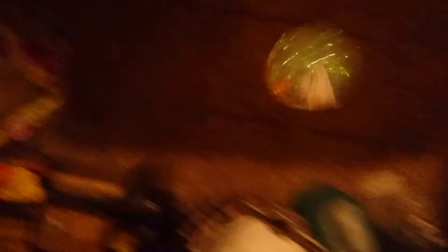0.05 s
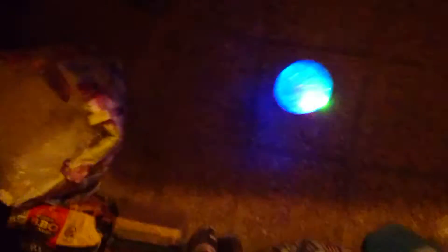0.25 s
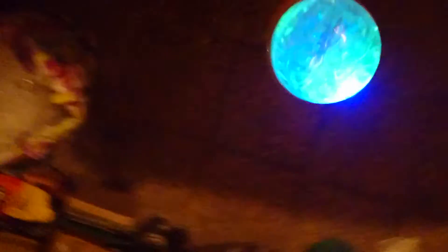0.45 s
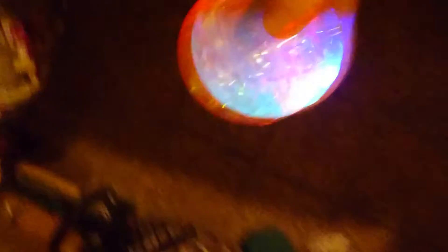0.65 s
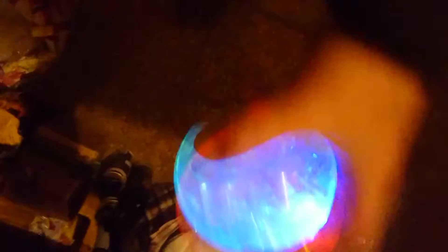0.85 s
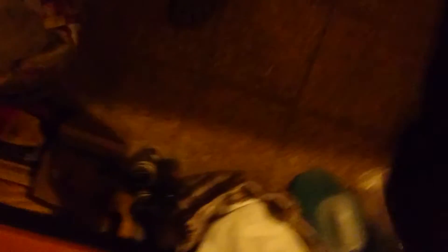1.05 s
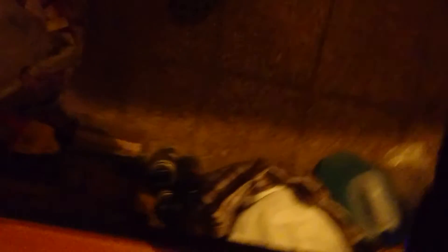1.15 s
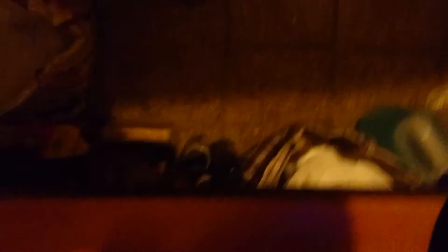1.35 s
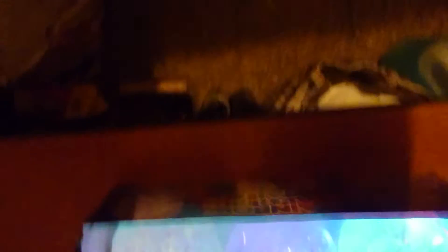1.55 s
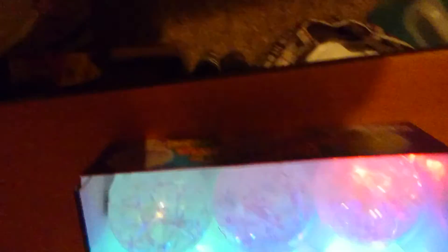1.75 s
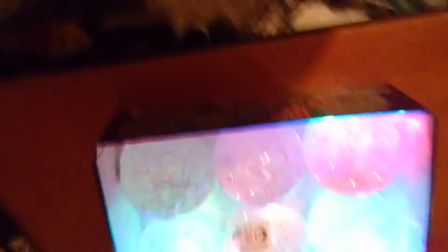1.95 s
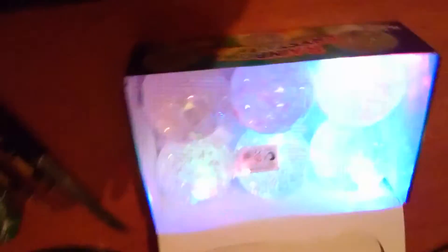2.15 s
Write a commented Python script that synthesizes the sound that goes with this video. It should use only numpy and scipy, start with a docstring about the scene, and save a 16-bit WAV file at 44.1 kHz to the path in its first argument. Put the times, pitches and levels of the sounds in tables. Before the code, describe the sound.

A hard rubber ball hits a tiled floor at 0.2 seconds with a bright crack, brief ring and low thump in a small room. A soft catch follows around 0.6 seconds, then faint sleeve swishes. From 1.5 to 1.8 seconds, a cardboard and plastic box knocks, snaps and scrapes on a nearby table. The handheld microphone rumbles, with muffled bumps at 1.9 seconds and a finger rub around 2 seconds.

```python
"""Ball bounce and box slide

A hard rubber light-up ball hits a tiled floor once in a small room: a bright crack, a ringing shell
and a low thump. A hand catches it softly. Then a cardboard and plastic box is knocked and slid on a
table close by, while the hand that holds the microphone bumps and rubs it."""
import sys
import numpy as np
from scipy import signal
from scipy.fft import rfft, irfft
from scipy.io import wavfile

SR = 44100
rng = np.random.default_rng(int(sys.argv[2]) if len(sys.argv) > 2 else 0)


def put_to_file(sound):
    """Save the sound as 16-bit audio at rate SR, in the file named by the first command-line argument."""
    columns = np.atleast_2d(sound).T  # one column per channel
    safe = np.clip(columns, -1, 1)
    whole_steps = np.round(safe * 32767)
    wavfile.write(sys.argv[1], SR, whole_steps.astype(np.int16))


N = 97020
TIME = np.arange(N) / SR
FFT_SIZE = 2 ** 17
FREQS = np.maximum(np.arange(FFT_SIZE // 2 + 1) * SR / FFT_SIZE, 1)
BOUNCE_S, SNAP_S = 0.221, 1.6445

# stereo image: likeness of the channels (f/Hz, correlation)
LIKENESS = [(40, 0.28), (150, 0.025), (700, 0.44), (1300, -0.13), (2200, -0.1), (5000, 0.012),
            (16000, -0.027)]
# tilt between the two microphone ports; pan is always left minus right (f/Hz, pan/dB)
PORT_TILT = [(150, 1), (600, 2.5), (1400, -3), (3000, 1), (8000, -0.5), (13000, 1)]
# room tone (t/s, air level/dB, hiss level/dB)
ROOM_FADES = [(0, -66.5, -71), (0.09, -73, -79.5), (0.55, -65, -67), (0.8, -68, -74.5), (1.0, -69.5, -64.5),
              (1.43, -65.5, -68.5), (1.9, -61, -65.5), (2.2, -69, -70.5)]
# tone of the air and of the hiss (f/Hz, level/dB)
AIR_EQ = [(100, 5.5), (200, 0.5), (480, -2.5), (800, -5), (1300, -10), (2300, -10.5), (3500, -13),
          (5000, -21), (7000, -31.5), (16000, -32)]
HISS_EQ = [(1500, -5), (4400, -7.5), (6800, -11), (9000, -8), (12300, 0), (14000, -9.5), (16000, -3.5)]

# dull bumps through the grip (t/s, level/dB, f/Hz, t60/s, pan/dB)
BUMPS = [(0.607, -45.5, 129.5, 0.019, 20), (0.649, -48.5, 195, 0.03, 0), (1.583, -27.5, 72.6, 0.21, 3),
         (1.667, -33.5, 54.6, 0.21, 3.5), (1.682, -34.5, 88.3, 0.19, 2), (1.901, -24.5, 26.7, 0.094, 34),
         (1.903, -23, 90, 0.01, 17), (1.948, -18, 93, 0.0065, 13)]
# rumble of the moving microphone (t/s, level/dB)
RUMBLE_FADE = [(0, -57), (0.3, -47.5), (0.55, -55), (0.76, -49), (0.92, -61), (1.2, -60), (1.36, -52.5),
               (1.6, -49.5), (1.85, -37.5), (2.05, -38), (2.2, -47.5)]
# a finger rubs beside the microphone (t/s, level/dB, pan/dB)
RUB_FADE = [(1.93, -100, 10), (1.96, -72, 7), (2.005, -54, 11), (2.021, -42.5, 14), (2.038, -40, 2),
            (2.045, -49, 14), (2.07, -72, 5), (2.1, -100, 3)]
# the finger catches and lets go (t/s, level/dB)
SLIPS = [(2.0258, -28), (2.0289, -27), (2.0327, -28), (2.0401, -20), (2.041, -17)]
# tone of the rumble, rub and slips (f/Hz, level/dB)
RUMBLE_EQ = [(10, 3), (20, -3), (40, -11.5), (80, -31.5), (160, -33), (1000, -63)]
RUB_EQ = [(150, 6.5), (850, -6), (1400, -21), (2100, -17.5), (3600, -13.5), (4500, -3.5), (5050, 1),
          (5700, -10), (6700, -20), (10000, -19), (12500, -13), (16000, -21)]
SLIP_EQ = [(700, 10.5), (1500, -8.5), (5000, 5.5), (6500, -2), (12000, 2), (16000, -13)]

# swishes of hand and sleeve (t/s, attack/s, t60/s, mid level/dB, treble level/dB)
SWISHES = [(0.109, 0.013, 0.68, -59.5, -64.5), (0.578, 0.0047, 0.17, -65, -64),
           (0.616, 0.011, 0.26, -66.5, -58.5), (0.92, 0.051, 0.51, -85, -70),
           (0.976, 0.0055, 0.24, -65.5, -66), (1.029, 0.0023, 0.34, -58.5, -57)]
# their two bands (f/Hz, level/dB)
SWISH_MID_EQ = [(150, -2.5), (500, -9.5), (1400, -6), (1900, -1), (2700, -4.5), (4500, -9.5), (7000, -26.5)]
SWISH_TREBLE_EQ = [(2500, -21), (4500, -5), (7500, -6.5), (10000, 1), (12500, 6.5), (16000, -4)]
# the ball ticks against the catching hand (t/s, level/dB)
CATCH_TICKS = [(0.5815, -62), (0.589, -57), (0.617, -48), (0.648, -51)]

# the box's scrape and its brief hum (t/s, level/dB)
SLIDE_FADE = [(1.462, -100), (1.475, -55), (1.535, -44.5), (1.566, -56), (1.583, -34.5), (1.62, -37),
              (1.655, -39.5), (1.71, -40), (1.745, -48), (1.80, -48.5), (1.83, -58), (1.88, -73),
              (1.96, -63), (2.05, -67), (2.08, -100)]
JUDDER_FADE = [(1.70, -80), (1.745, -56), (1.795, -56), (1.815, -80)]
# tone of the scrape, the hum and the edge's snap (f/Hz, level/dB)
SLIDE_EQ = [(100, -4), (230, -2), (430, -9), (640, -8.5), (1000, -7), (1400, -9.5), (1900, -7.5),
            (2800, -11.5), (5200, -15.5), (6200, -19), (7200, -22.5), (10800, -21.5), (12400, -16),
            (16000, -23.5)]
JUDDER_EQ = [(700, -47), (960, -18.5), (1030, -1.5), (1100, -23), (1500, -35)]
SNAP_EQ = [(500, -28), (1900, -4), (2900, -8.5), (4000, -5.5), (5100, 2.5), (6250, 2), (6900, -14.5),
           (10000, -16.5), (12500, -9.5), (16000, -29)]
# knocks of the box (t/s, t60/s, hollow/dB, panel/dB, edge/dB, crisp/dB, pan/dB)
KNOCKS = [(1.4709, 0.078, -54, -43, -59, -50.5, -3.5), (1.509, 0.044, -47, -45, -51.5, -56, 6),
          (1.5159, 0.044, -37, -38, -44.5, -51, -5.5), (1.529, 0.073, -42, -49, -73, -51, -2.5),
          (1.571, 0.079, -40, -31, -35, -43.5, -1.5), (1.5818, 0.044, -37, -30, -30.5, -38, -3.5),
          (1.5853, 0.11, -36.5, -27.5, -31.5, -47, -6), (1.6, 0.045, -35, -29, -28, -35, 0),
          (1.615, 0.14, -43.5, -36.5, -36, -43.5, -16), (1.6225, 0.072, -38.5, -39.5, -32.5, -35.5, 3),
          (1.6558, 0.072, -68, -44.5, -34, -59, -1), (1.6682, 0.066, -38, -36.5, -35, -49, -3),
          (1.69, 0.034, -64, -61, -38.5, -57, -2), (1.757, 0.17, -47.5, -59.5, -53.5, -45, -3),
          (1.9004, 0.043, -50.5, -59, -53.5, -53, 23), (1.9287, 0.0089, -50, -57, -61, -47, -8.5)]
# its four bands, from hollow body up to plastic window (f/Hz, level/dB)
HOLLOW_EQ = [(100, -19), (250, -7), (430, -9.5), (620, -0.5), (850, -4), (1200, -12.5), (2000, -25),
             (5000, -38)]
PANEL_EQ = [(300, -43.5), (800, 0), (1200, -1), (1600, 1.5), (1900, 3.5), (2500, -6.5), (3500, -3),
            (7000, -44.5)]
EDGE_EQ = [(1000, -22.5), (2800, -21), (4000, -2), (5200, 1), (6100, -4), (6800, -13.5), (10000, -18.5),
           (16000, -44.5)]
CRISP_EQ = [(3000, -34.5), (6500, -4), (8300, -1), (10500, -1.5), (12400, 9), (14000, -3.5), (16000, -9)]
# the box thuds on the table (t/s, level/dB)
THUDS = [(1.5158, -38), (1.5822, -43.5), (1.6012, -38), (1.6688, -26.5)]
# modes of the hollow box, relative to each thud (f/Hz, level/dB)
BOX_MODES = [(330, -12), (560, -8), (621, -3), (690, -5), (740, -9.5), (1125, -7.5)]

# the floor's thump, direct and off the walls (t/s, level/dB)
THUMP_ARRIVALS = [(0.2217, -46), (0.2331, -27), (0.2428, -29.5), (0.2686, -36)]
# low modes of floor and room (f/Hz, level/dB, t60/s)
ROOM_MODES = [(46, -40, 0.46), (90, -40.5, 0.38), (150.2, -40.5, 0.27), (207.1, -47, 0.37)]
# tone of the ball's slap and of its crack in the room (f/Hz, level/dB)
SLAP_EQ = [(200, -15.5), (450, -29), (750, -9.5), (1300, -23.5), (2200, -16), (3750, -9), (4150, -23),
           (4500, -12), (5400, -9), (7700, -5.5), (8450, -20), (9000, -6), (11900, 0), (16000, -1)]
CRACK_EQ = [(200, -12.5), (400, -27.5), (720, -20), (1250, -34), (1900, -23), (2600, -23.5), (3250, -15),
            (3780, -10.5), (4150, -21), (4500, -6.5), (4850, -9), (5350, 1.5), (6050, -2), (7150, -9),
            (7650, -4), (8400, -12.5), (9200, -3.5), (10400, -10), (12200, -1.5), (13700, -8),
            (16000, -13.5)]
# the crack comes back from the walls (t/s, level/dB)
WALL_ECHOES = [(0.2343, -26.5), (0.2503, -24), (0.3107, -39)]
# ring of the ball's shell (f/Hz, level/dB)
SHELL_MODES = [(3290, -48), (3790, -49.5), (5185, -41.5), (5295, -37.5), (5337, -34.5), (5512, -41),
               (6005, -36), (9468, -39.5), (11598, -36.5), (13690, -42)]


def amp(db):
    """Decibels to gain."""
    return 10 ** (np.asarray(db) / 20)


def in_time(rows):
    """One automation curve for each column after the time."""
    times, *columns = np.transpose(rows)
    return [np.interp(TIME, times, column) for column in columns]


def over_hz(points):
    """A curve through the points on a log frequency axis."""
    hz, values = np.transpose(points)
    return np.interp(np.log(FREQS), np.log(hz), values)


def pan(db):
    """Constant-power left and right gains for a level difference."""
    gains = amp(np.array([[.5], [-.5]]) * db)
    return gains / np.sqrt(np.mean(gains ** 2, axis=0))


def eq(x, points):
    """Minimum-phase EQ, scaled to keep the power of white noise."""
    gain = amp(over_hz(points))
    cepstrum = irfft(np.log(gain / np.sqrt(np.mean(gain ** 2))))
    cepstrum[1:FFT_SIZE // 2] *= 2
    cepstrum[FFT_SIZE // 2 + 1:] = 0
    return irfft(rfft(x, FFT_SIZE) * np.exp(rfft(cepstrum)))[..., :N]


def noise():
    """Wide white noise, the channels partly alike in the lows and unrelated in the treble."""
    alike = over_hz(LIKENESS)
    mid, side = rfft(rng.standard_normal((2, FFT_SIZE)))
    return irfft(np.sqrt((1 + alike) / 2) * mid + np.sqrt((1 - alike) / 2) * side * [[1], [-1]])[:, :N]


def decay(start, t60, attack=0.000055):
    """Linear attack, exponential fall; times in seconds."""
    age = TIME - start
    return np.clip(age / attack, 0, 1) * np.exp(-np.log(1000) * np.clip((age - attack) / t60, 0, 10))


def click(start):
    """A one-sample impulse."""
    return 1.0 * (np.arange(N) == int(start * SR))


def mode(start, hz, t60, attack=0.000076):
    """A struck, dying sine."""
    return decay(start, t60, attack) * np.sin(2 * np.pi * hz * (TIME - start))


def friction(grains_per_s, rough_db):
    """Stick and slip: noise grains at random moments, each with its own strength."""
    grain = np.cumsum(rng.random(N) < grains_per_s / SR)
    strength = amp(rough_db * np.minimum(rng.exponential(1, N), 4))[grain]
    return noise() * strength / np.sqrt(np.mean(strength ** 2))


def room_tone():
    """A bed of quiet air and thin hiss that swell and fade."""
    air_db, hiss_db = in_time(ROOM_FADES)
    return (eq(noise(), AIR_EQ) * amp(air_db) + eq(noise(), HISS_EQ) * amp(hiss_db)) * pan(-1.2)


def mic_handling():
    """The grip on the microphone: muffled bumps, rumble and a finger's rub with crisp slips."""
    bumps = sum(amp(db) * mode(s, hz, t60) * pan(pan_db) for s, db, hz, t60, pan_db in BUMPS)
    bumps = signal.sosfilt(signal.butter(2, 280.3, "lowpass", fs=SR, output="sos"), bumps)
    rumble_db, = in_time(RUMBLE_FADE)
    rumble = eq(noise(), RUMBLE_EQ) * amp(rumble_db) * pan(14)
    rub_db, pan_db = in_time(RUB_FADE)
    rub = eq(friction(grains_per_s=510, rough_db=4) * amp(rub_db), RUB_EQ) * pan(pan_db)
    slips = eq(sum(amp(db) * click(s) for s, db in SLIPS), SLIP_EQ) * pan(-16)
    return bumps + rumble + rub + slips


def throw_and_catch():
    """Hand and sleeve swish as they throw, catch and reach; the ball ticks against the hand."""
    swishes = 0
    for k, band in enumerate((SWISH_MID_EQ, SWISH_TREBLE_EQ)):
        power = sum((amp(levels[k]) * decay(s, t60, attack)) ** 2 for s, attack, t60, *levels in SWISHES)
        swishes += eq(friction(grains_per_s=800, rough_db=2) * np.sqrt(power), band)
    ticks = noise() * sum(amp(db) * decay(s, t60=0.012) for s, db in CATCH_TICKS)
    return swishes * pan(-2.2) + eq(ticks, SWISH_TREBLE_EQ)


def box_slide():
    """The box scrapes over the table and briefly judders with a narrow hum."""
    slide_db, = in_time(SLIDE_FADE)
    scrape = eq(friction(grains_per_s=1400, rough_db=1.5) * amp(slide_db), SLIDE_EQ)
    judder_db, = in_time(JUDDER_FADE)
    gate = (TIME > JUDDER_FADE[0][0]) & (TIME < JUDDER_FADE[-1][0])
    judder = eq(noise() * amp(judder_db) * gate, JUDDER_EQ)
    return (scrape + judder) * pan(-1.5)


def box_knocks():
    """Each knock is a sharp click and a short noisy chatter in the box's four bands."""
    click_gain = amp(-6) * np.sqrt(SR / 1000)   # 6 dB under the energy of 1 ms of chatter
    knocks = 0
    for k, band in enumerate((HOLLOW_EQ, PANEL_EQ, EDGE_EQ, CRISP_EQ)):
        chatter_power = clicks = 0
        for s, t60, *levels, pan_db in KNOCKS:
            gain = amp(levels[k]) * pan(pan_db)
            chatter_power += (gain * decay(s, t60, attack=0.00052)) ** 2
            clicks += gain * click(s + rng.random() / 1000)
        knocks += eq(noise() * np.sqrt(chatter_power) + clicks * click_gain, band)
    return knocks


def box_thuds():
    """Heavy contacts ring the hollow body; its modes alternate polarity in pairs."""
    body = sum(amp(thud_db + db) * mode(s, hz, t60=0.036, attack=0.0008) * (-1) ** (k // 2)
               for s, thud_db in THUDS for k, (hz, db) in enumerate(BOX_MODES))
    return body * pan(-0.53)


def box_snap():
    """The box's edge snaps against the table: a click on a tight noise burst."""
    burst = noise() * amp(-17.5) * decay(SNAP_S, t60=0.02, attack=0.0001)
    return eq(burst + amp(-7) * click(SNAP_S), SNAP_EQ)


def floor_thump():
    """The low end of the bounce: the floor thumps and the room's modes boom."""
    thump = sum(amp(db) * mode(s, hz=106, t60=0.05) for s, db in THUMP_ARRIVALS)
    boom = sum(amp(db) * mode(BOUNCE_S, hz, t60) for hz, db, t60 in ROOM_MODES)
    return (thump + boom) * pan(1.7)


def room_damping(ring, dull_hz=7000, dull_s=0.17, knee_s=0.11, fade_db_per_s=139):
    """The room swallows the bounce's treble; past the knee the whole tail dies faster."""
    age = np.maximum(TIME - BOUNCE_S, 0)
    dull = irfft(rfft(ring, FFT_SIZE) / (1 + (FREQS / dull_hz) ** 8))[:, :N]
    treble = (ring - dull) * np.exp(-(age / dull_s) ** 2)
    return (dull + treble) * amp(-fade_db_per_s * np.maximum(age - knee_s, 0))


def ball_crack():
    """Hard rubber slaps the tile, the crack fills the room and the ball's shell rings."""
    slap = eq(noise() * decay(BOUNCE_S, t60=0.058, attack=0.00097), SLAP_EQ) * amp(-14) * pan(-4)
    reverb = amp(-21) * decay(BOUNCE_S, t60=0.3, attack=0.003)
    echoes = sum(amp(db) * decay(s, t60=0.027) for s, db in WALL_ECHOES)
    crack = eq(noise() * np.hypot(reverb, echoes), CRACK_EQ) * pan(-1.5)
    partials = sum(amp(db) * np.sin(2 * np.pi * (hz * TIME + rng.random((2, 1))))
                   for hz, db in SHELL_MODES)
    shell = partials * decay(BOUNCE_S, t60=0.29)
    return slap + room_damping(crack + shell)


def scene():
    """Bounce, catch, then the box, over handling noise and room tone."""
    ball = ball_crack() + floor_thump() + throw_and_catch()
    box = box_knocks() + box_thuds() + box_snap() + box_slide()
    return ball + box + mic_handling() + room_tone()


def record(dry):
    """Each microphone port colours its channel; a steep high cut trims the top."""
    heard = irfft(rfft(dry, FFT_SIZE) * pan(over_hz(PORT_TILT)))[:, :N]
    high_cut = signal.ellip(10, .1, 85, 15700, fs=SR, output="sos")
    return signal.sosfilt(high_cut, heard)


dry = scene()
out = record(dry)
put_to_file(out)
```